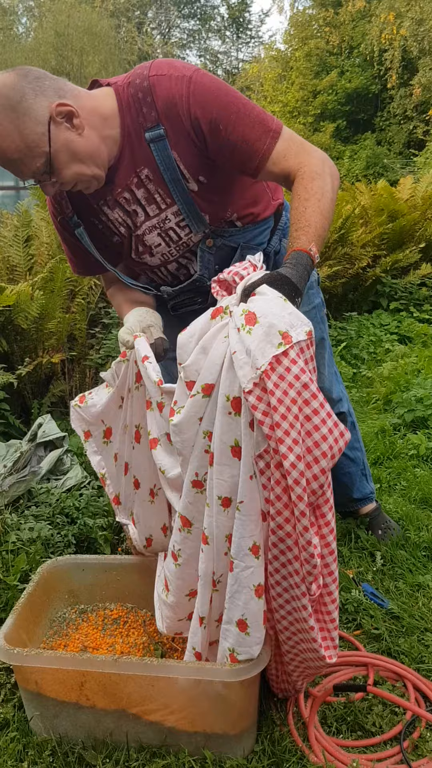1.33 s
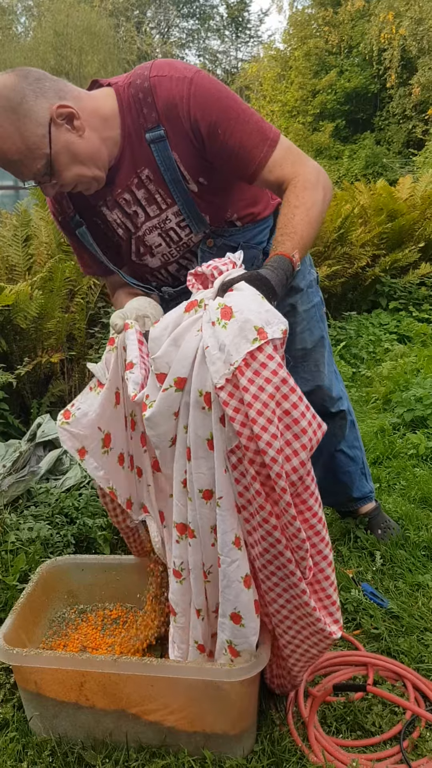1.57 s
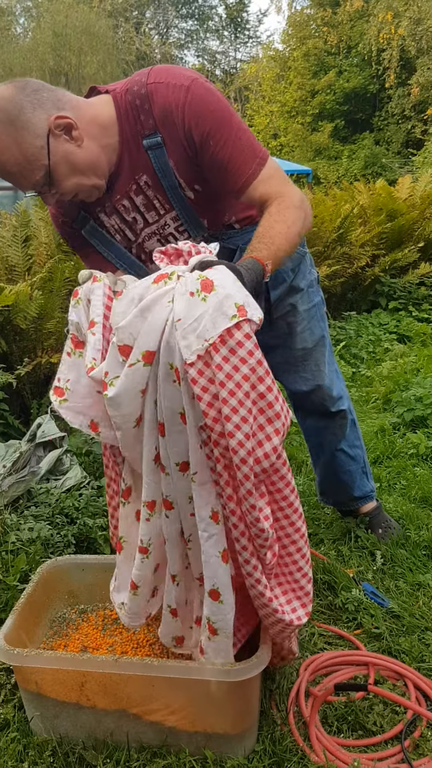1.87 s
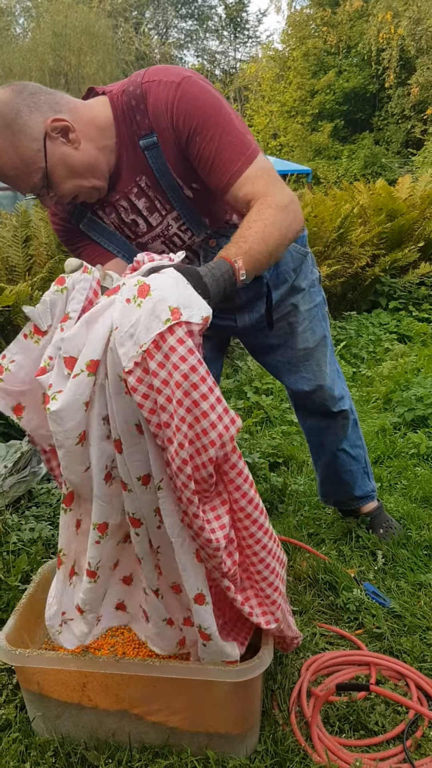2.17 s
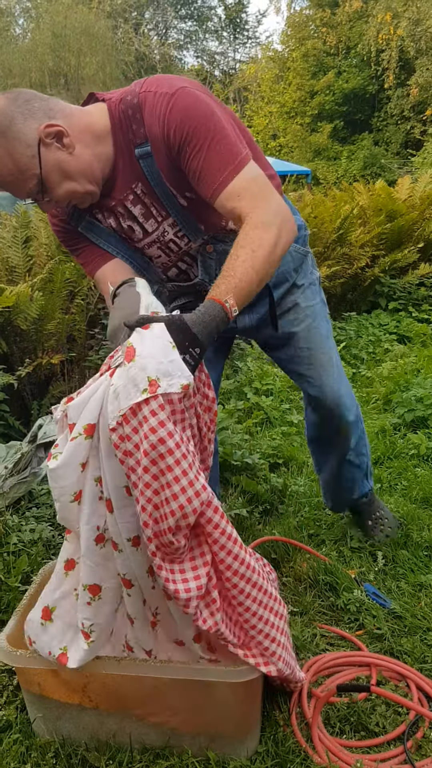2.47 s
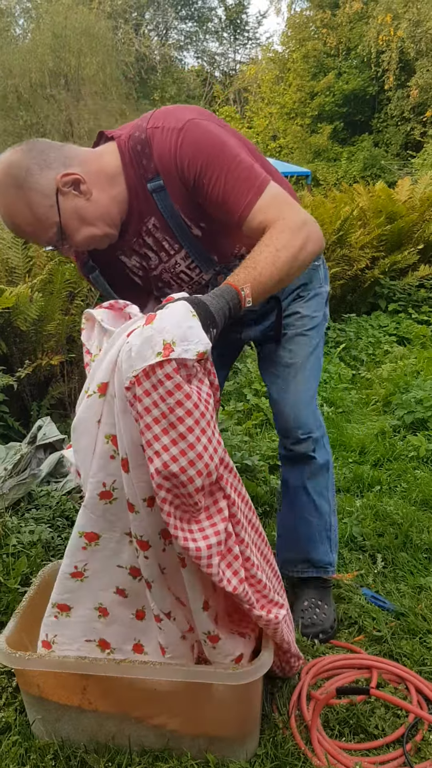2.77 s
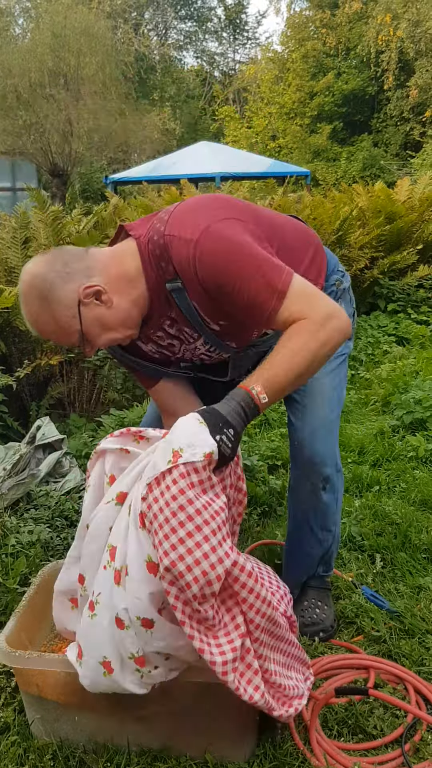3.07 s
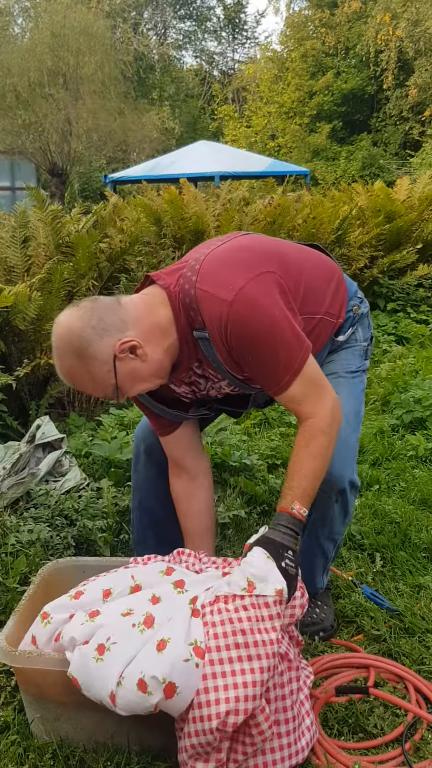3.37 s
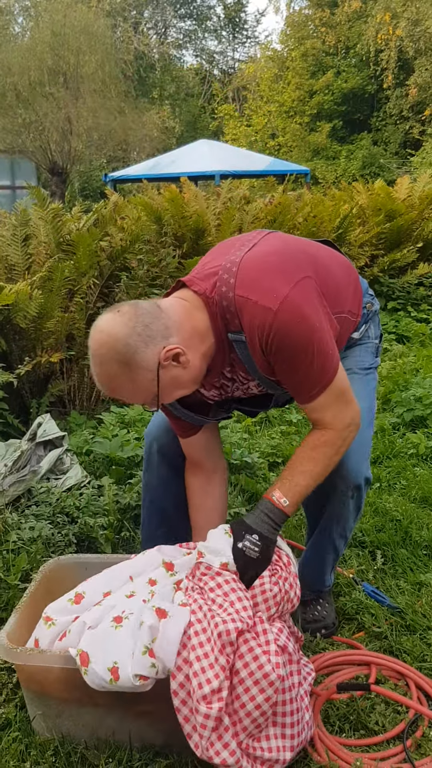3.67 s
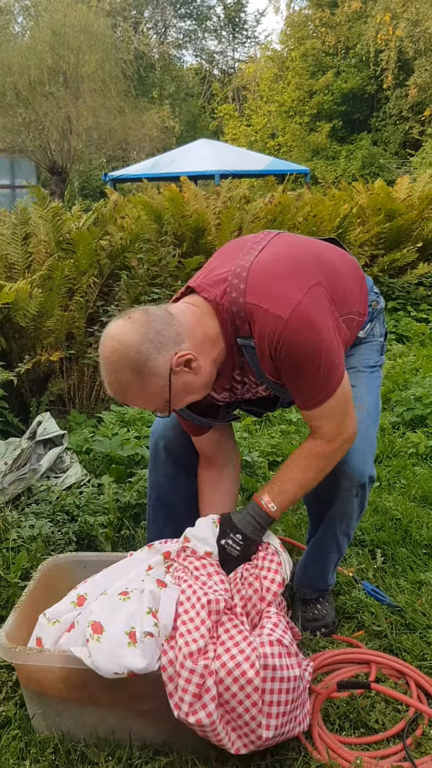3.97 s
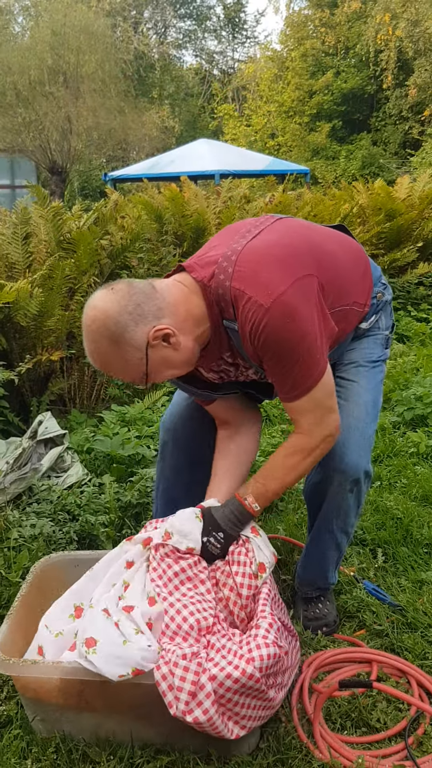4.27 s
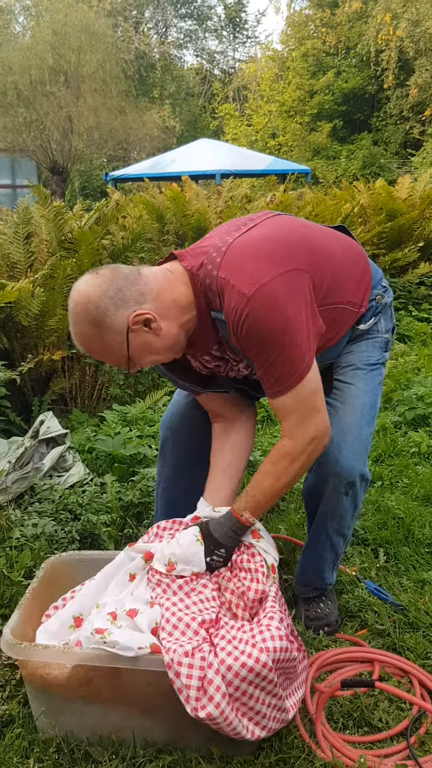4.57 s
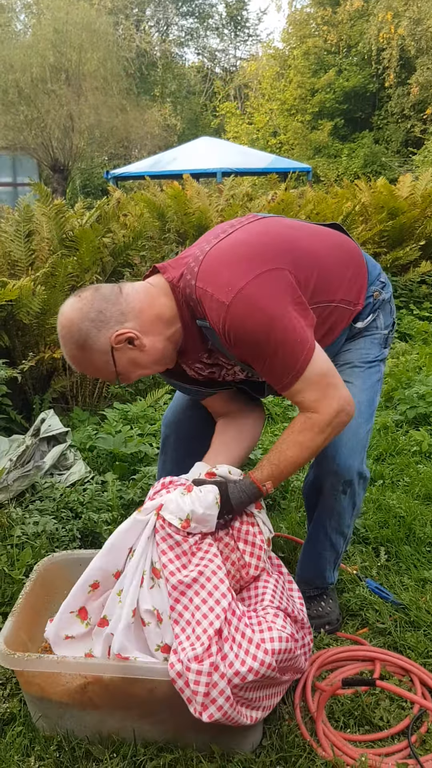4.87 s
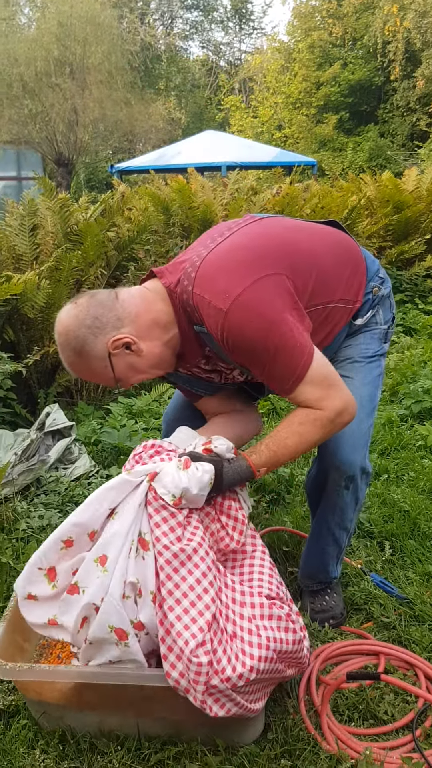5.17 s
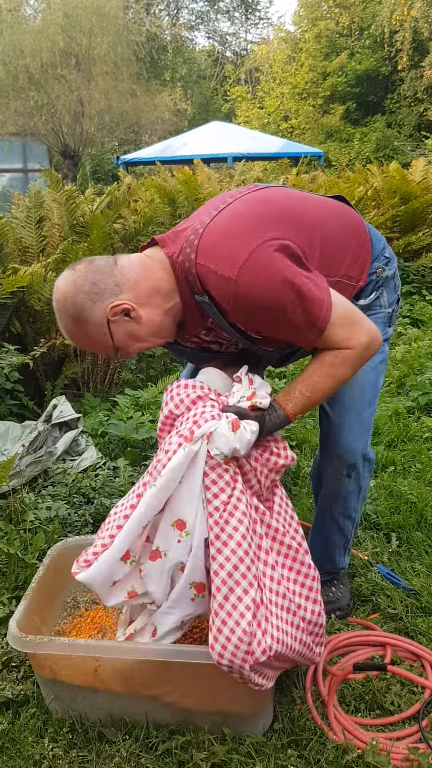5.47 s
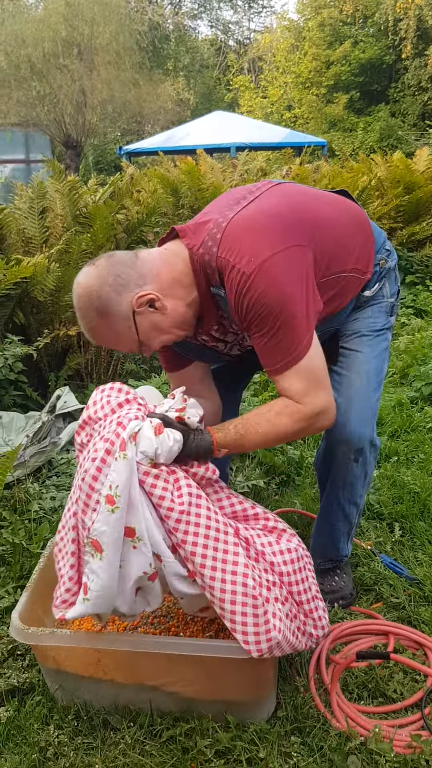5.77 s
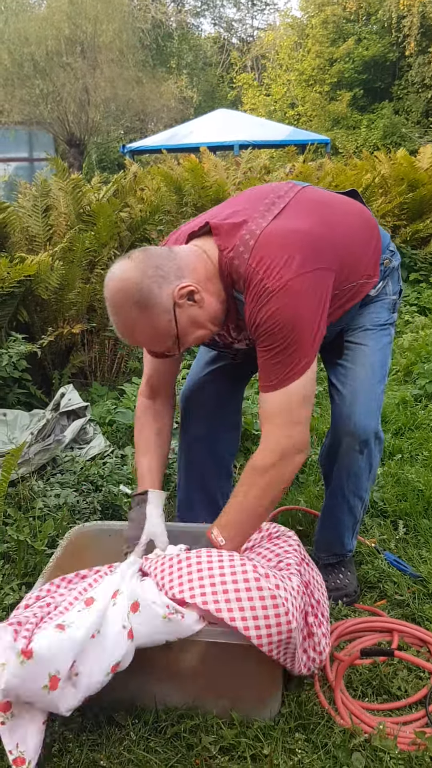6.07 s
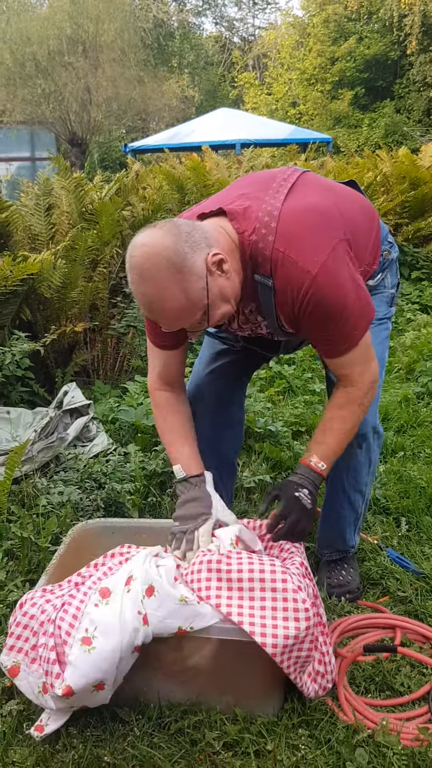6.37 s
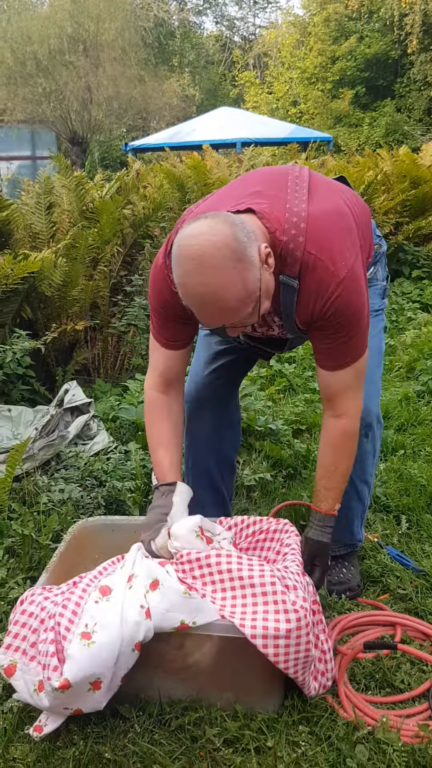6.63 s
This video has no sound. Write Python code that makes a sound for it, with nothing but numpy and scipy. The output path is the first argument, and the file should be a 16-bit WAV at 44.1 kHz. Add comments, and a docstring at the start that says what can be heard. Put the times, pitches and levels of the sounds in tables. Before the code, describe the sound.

The steady, pulsing hum of a piston air compressor, mixed with an electric whine and ticking hiss, a few steps away.

```python
"""A small piston air compressor runs steadily on a lawn, a few steps away. From the start, cooling air
rushes through its housing and a fast brush motor whines as it drives a slower crank. Every piston stroke
thumps, ticks the valves and brakes the motor a little. In the first second the motor speeds up slightly,
then it sags. The microphone drifts slowly, which changes the colour of the sound; late on its path,
a reflection cancels much of the whine on the right."""
import sys
import numpy as np
from scipy.fft import rfft, irfft
from scipy.io import wavfile

SR = 44100
rng = np.random.default_rng(int(sys.argv[2]) if len(sys.argv) > 2 else 0)


def unload_wav(signal):
    """Save mono or channel-first audio to the path in sys.argv[1] as 16-bit WAV at rate SR, clipped to [-1, 1]."""
    wavfile.write(
        sys.argv[1],
        SR,
        np.round(np.clip(np.atleast_2d(signal).T, -1, 1) * 32767).astype(np.int16),
    )


N = 423360
TIME = np.arange(N) / SR
FREQS = np.maximum(np.arange(N // 2 + 1) * SR / N, 1)
LEFT_ONLY = np.array([[1], [0]])  # row 0 is the left side, row 1 the right
TURNS_PER_STROKE = 4.7358  # motor turns for one piston stroke
BASS_LAG_S, TREBLE_LAG_S = .00011, .00018  # how much later a tone reaches the left side

# How far the air noise lags on the left, bent by nearby reflections: (frequency [Hz], lag [radians])
AIR_LAG = [(100, 0), (500, .35), (1000, .4), (1200, 1.3), (1550, 2.1), (1900, 1.9), (2250, 2.4),
           (2550, 1.2), (3000, 2.7), (3500, 4.4), (5000, 5), (6200, 6.6), (7600, 9), (15000, 17)]


def from_db(db):
    """Turn decibels into a gain."""
    return 10 ** (np.asarray(db) / 20)


def rms_one(x):
    """Scale a signal to an average (rms) level of 1."""
    return x / np.sqrt(np.mean(x ** 2) + 1e-20)


def in_time(points):
    """Join (time, value) points into one value per sample."""
    return np.interp(TIME, *np.transpose(points))


def over_hz(points):
    """Join (frequency, value) points into one value per frequency."""
    hz, value = np.transpose(points)
    return np.interp(np.log(FREQS), np.log(hz), value)


def pan(db):
    """Left and right gains that make the left louder by db and keep the total power."""
    gains = from_db(np.array([[.5], [-.5]]) * db)
    return gains / np.sqrt(np.mean(gains ** 2, axis=0))


def drift(rate_hz):
    """A random wobble of typical size 1, mostly slower than rate_hz."""
    return rms_one(irfft(rfft(rng.standard_normal(N)) / (1 + (FREQS / rate_hz) ** 2), N))


def tone(phase, hz, level_db, pan_db, lag_s):
    """A pure tone that reaches the left side a little later."""
    lag = 2 * np.pi * hz * lag_s * LEFT_ONLY
    wave = np.sin((phase % (2 * np.pi) - lag).astype(np.float32))
    return np.sqrt(2) * from_db(level_db) * pan(pan_db) * wave


def stereo_noise():
    """Left and right spectra of an even hiss: both share the direct sound, each adds scattered sound."""
    # How alike the two sides are: (frequency [Hz], likeness [0-1])
    likeness = [(60, 0), (600, 0.93), (1700, 0.83), (3100, 0.25), (4200, 0.54), (6000, 0.23), (15000, 0.08)]
    direct, *scattered = rfft(rng.standard_normal((3, N))) * np.sqrt(SR / 2)
    alike = over_hz(likeness)
    lag = np.exp(-1j * over_hz(AIR_LAG) * LEFT_ONLY)
    return np.sqrt(alike) * direct * lag + np.sqrt(1 - alike) * np.array(scattered)


def cooling_air(place, left_share=.35, lag_shrink=.25):
    """Air rushes through the housing; its colour blends from one end of the path to the other."""
    # The plain rush of air: (frequency [Hz], level [dB per Hz])
    rush_levels = [(25.0, -68), (63.0, -62.5), (130.0, -68.5), (300.0, -65.5), (750.0, -63.5),
                   (1500.0, -64.5), (3500.0, -68), (6200.0, -66.5), (7100.0, -69), (8250.0, -77.5),
                   (9500.0, -73.5), (11000.0, -70), (13500.0, -68), (15700.0, -72.0)]
    # Peaks where the housing rings and dips cut by reflections:
    # (frequency [Hz], width [Hz], left height [dB], right height [dB], right change along the path [dB])
    resonances = [(400.0, 90.0, -1.5, 2.8, 0.6), (500.0, 110.0, -6.1, -4.3, -0.7),
                  (720.0, 300.0, -0.3, 0.2, 3.0), (1120.0, 520.0, -0.4, -6.0, -1.0),
                  (1630.0, 310.0, 1.6, 3.2, -2.3), (2090.0, 230.0, -2.8, -4.6, -2.5),
                  (2450.0, 380.0, -0.1, 8.6, -3.5), (2850.0, 820.0, 3.6, -2.8, 3.3),
                  (3880.0, 830.0, 3.5, 3.8, -4.1), (4800.0, 560.0, -0.8, 5.3, -0.3),
                  (5280.0, 410.0, -1.8, -2.2, 6.5), (5720.0, 700.0, -0.0, 2.0, -4.4),
                  (6540.0, 170.0, 1.5, 2.5, 0.0), (7530.0, 350.0, -2.3, -1.4, 3.3),
                  (9400.0, 430.0, 1.9, 1.7, 4.2), (11620.0, 470.0, 5.1, 6.8, -5.6),
                  (12090.0, 450.0, 5.1, 4.0, -1.8), (12860.0, 400.0, 1.5, 2.5, -2.0)]
    rush = stereo_noise() * from_db(over_hz(rush_levels))
    out = 0
    for end in (-.5, .5):
        colour_db = 0
        for hz, width_hz, left_db, right_db, shift_db in resonances:
            # a reflection's detour shortens along the path, so the dips near 5100 Hz slide upward
            centre_hz = hz + end * 260 * np.exp(-((hz - 5100) / 800) ** 2)
            bump = np.exp(-4 * np.log(2) * ((FREQS - centre_hz) / width_hz) ** 2)
            # the right side catches most of the changing reflections
            height_db = np.array([[left_db + left_share * end * shift_db], [right_db + end * shift_db]])
            colour_db = colour_db + bump * height_db
        # the machine comes more to the front along the path, so the left side lags less
        turn = np.exp(1j * end * lag_shrink * np.minimum(over_hz(AIR_LAG), np.pi) * LEFT_ONLY)
        blend = .5 + 2 * end * place
        out = out + blend * irfft(rush * turn * from_db(colour_db), N)
    return out


def valves(air, crank, knock_hz=1300, tick_hz=8500, uneven_db=1.5):
    """Each valve opening adds a puff to the air noise, with a mid-pitched knock and a high tick."""
    # Valve openings: (start [share of a stroke], strength [relative], fade time [share of a stroke])
    openings = [(.25, .5, .09), (.63, 1.0, .05), (.9, .45, .04)]
    stroke = crank / (2 * np.pi)
    bursts = sum(size * np.exp(-((stroke - start) % 1) / fade) for start, size, fade in openings)
    pulsing = rms_one(1 + bursts * from_db(uneven_db * drift(40))) - 1
    puff = .29  # the same at every frequency
    knock = .48 * np.exp(-2 * np.log(FREQS / knock_hz) ** 2)
    tick = .8 / (1 + (tick_hz / FREQS) ** 4)
    return air + pulsing * irfft(rfft(air) * (puff + knock + tick), N)


def motor(shaft, motor_hz, place, whine_multiple=12, whine_db=-30, twin_db=-45):
    """The fan whines, the spinning rotor hums and the brushes (its sliding contacts) buzz."""
    # Rotor and fan tones:
    # (pitch [times the motor speed], level [dB], left minus right [dB], change along the path [dB])
    rotor_tones = [(1, -27, -1.4, 0), (2, -43.8, -.5, 0), (3, -45.9, 3, -1.4), (4, -52, 2.6, 0),
                   (5, -52, 1.6, -3), (11, -51.5, 6, -1.5), (13, -53, -1.7, 0)]
    # Brush tones: same columns
    brush_tones = [(22, -41.5, 1, 0.5), (24, -53, 17, 17), (39, -54, 7, -24), (40, -64, 3, 0),
                   (41, -46, -2, 5)]
    angle = shaft + .002 * drift(40)
    fluttering_db = whine_db + .5 * drift(14)
    # the whine leans left, most of all near place 0.38, where a reflection cancels it on the right
    whine_pan_db = 4 + 13 * np.exp(-((place - .38) / .2) ** 2)
    whine_lag_s = .00021 - .00005 * place
    out = tone(whine_multiple * angle, whine_multiple * motor_hz, fluttering_db, whine_pan_db, whine_lag_s)
    for multiple, level_db, pan_db, shift_db in rotor_tones + brush_tones:
        phase = multiple * angle + rng.uniform(0, 2 * np.pi)
        lag_s = BASS_LAG_S if multiple < 10 else TREBLE_LAG_S
        out = out + tone(phase, multiple * motor_hz, level_db + shift_db * place, pan_db, lag_s)
    # each stroke shakes the brushes, so their strongest tone has a twin one stroke rate lower
    twin = brush_tones[0][0] - 1 / TURNS_PER_STROKE
    return out + tone(twin * angle, twin * motor_hz, twin_db, 0, TREBLE_LAG_S)


def piston(crank, stroke_hz, place, wall_hz=220, scatter_hz=400):
    """Each stroke makes one pressure pulse; the housing smears it, and no two are quite alike."""
    # The tones that add up to the thump:
    # (pitch [times the stroke rate], level [dB], left minus right [dB], change along the path [dB])
    thump_tones = [(1, -24.2, 0.4, 0.3), (2, -29.7, 0.0, -0.5), (3, -31.8, -0.2, 0.7),
                   (4, -31.8, -0.7, -3.4), (5, -31.2, -1.9, 0.1), (6, -29.4, -2.7, 2.4),
                   (7, -42.4, -4.5, 6.5), (8, -40.0, 2.5, -6.5), (9, -47.2, -2.4, 3.3),
                   (10, -46.0, -1.2, 1.1), (11, -38.7, -2.5, 5.0), (12, -43.8, -4.7, 6.5),
                   (13, -40.2, -0.0, 1.7), (14, -49.3, 4.3, 0.3), (15, -52.4, 9.7, -1.1),
                   (16, -45.7, 5.5, 1.2), (17, -49.6, 10.6, 3.7), (18, -51.6, 3.1, -10.6),
                   (19, -49.2, 3.7, 0.9), (22, -54.1, 8.8, 0.8), (25, -51.6, -1.2, -1.6),
                   (27, -48.5, -0.1, -0.9)]
    angle = crank + .017 * drift(17)
    out = 0
    for multiple, level_db, pan_db, shift_db in thump_tones:
        hz = multiple * stroke_hz
        # upper tones rattle round the housing and spread over the whole stroke
        smear = .075 if hz < scatter_hz else np.pi / 8
        # above its own ringing pitch, the housing wall swings against the pulse
        flip = np.pi * (hz > wall_hz)
        phase = multiple * angle + np.pi / 2 - smear * multiple * (multiple - 1) - flip
        waver_db = .16 * drift(6) * min(multiple / 10, 1)
        out = out + tone(phase, hz, level_db + shift_db * place + waver_db, pan_db, BASS_LAG_S)
    return out


def scene(mains_ripple_hz=100):
    """One turning shaft drives the whine, the piston and the valves."""
    # Motor speed: (time [s], speed [turns per s])
    motor_speed = [(0.2, 297.3), (0.51, 297.3), (0.88, 299.3), (5.31, 297.7), (8.7, 298.1)]
    # The microphone's path: (time [s], place [about -0.5 at one end, 0.5 at the other])
    microphone_path = [(0, -0.53), (1.7, -0.49), (3.2, -0.27), (4.8, 0.04), (6.2, 0.23), (8, 0.49),
                       (9.6, 0.27)]
    motor_hz, place = in_time(motor_speed), in_time(microphone_path)
    shaft = 2 * np.pi * np.cumsum(motor_hz) / SR  # angle in radians
    crank = shaft / TURNS_PER_STROKE
    mains = 2 * np.pi * mains_ripple_hz * TIME
    # each stroke and each pulse of mains power rocks the motor's speed and force, roughening its tones
    rocking = .038 * np.sin(crank) + .023 * np.sin(mains)
    force = 1 + .078 * np.cos(crank) + .079 * np.cos(mains)
    whine = force * motor(shaft + rocking, motor_hz.mean(), place)
    thump = piston(crank, motor_hz.mean() / TURNS_PER_STROKE, place)
    ticking_air = valves(cooling_air(place), crank)
    return ticking_air + whine + thump


def record(dry, lowest_hz=20, highest_hz=15780):
    """The microphone loses the deepest bass; the highest treble is cut steeply."""
    low_cut = 1 / np.sqrt(1 + (lowest_hz / FREQS) ** 4)
    high_cut = np.clip((highest_hz - FREQS) / 60 + .5, 0, 1)
    return irfft(rfft(dry) * low_cut * high_cut, N)


dry = scene()
out = record(dry)
unload_wav(out)
```